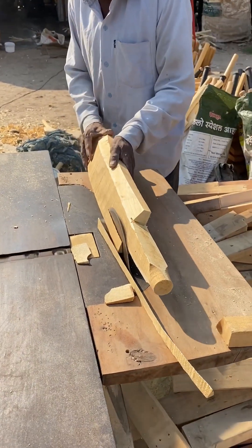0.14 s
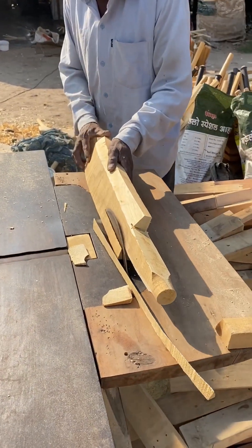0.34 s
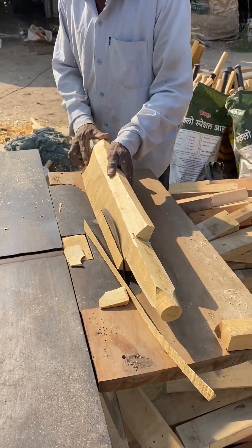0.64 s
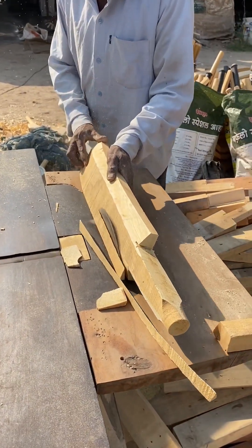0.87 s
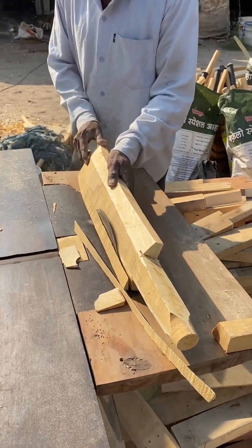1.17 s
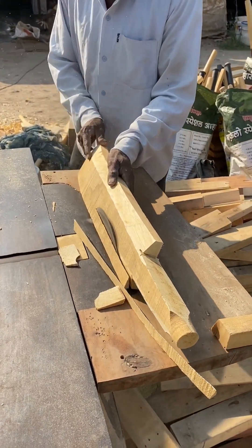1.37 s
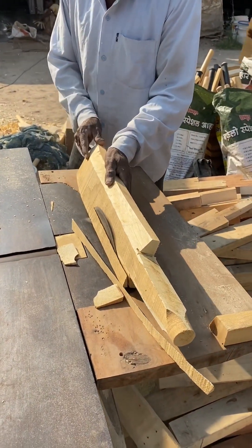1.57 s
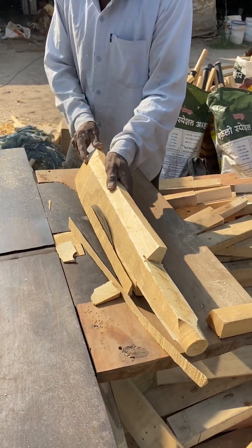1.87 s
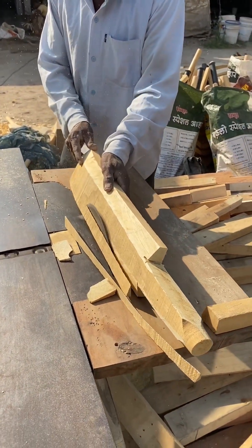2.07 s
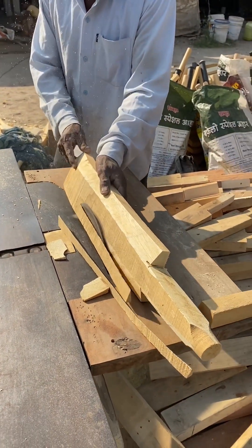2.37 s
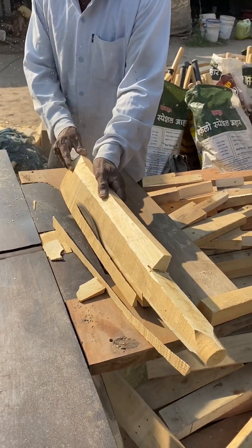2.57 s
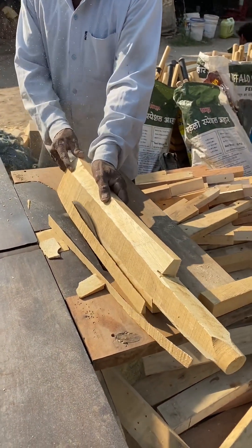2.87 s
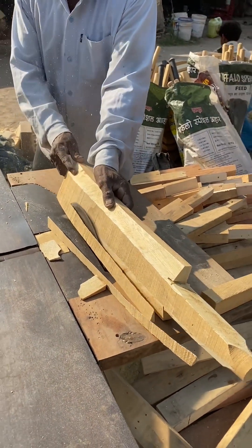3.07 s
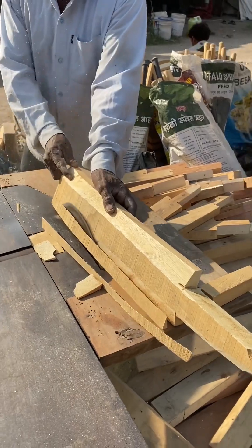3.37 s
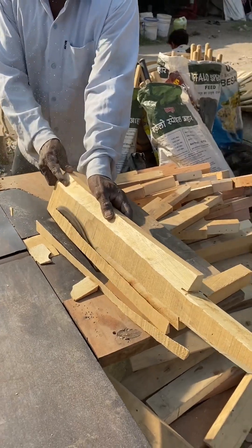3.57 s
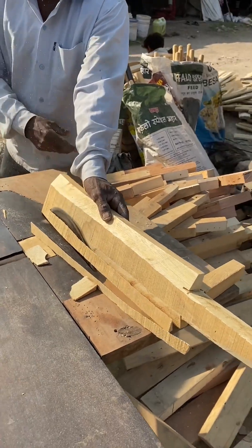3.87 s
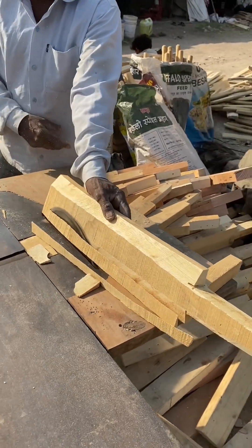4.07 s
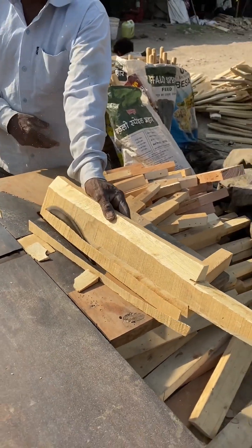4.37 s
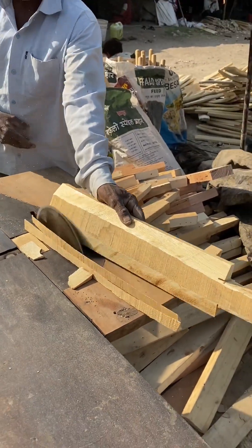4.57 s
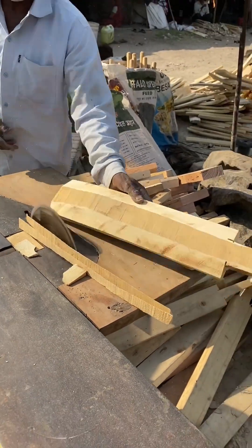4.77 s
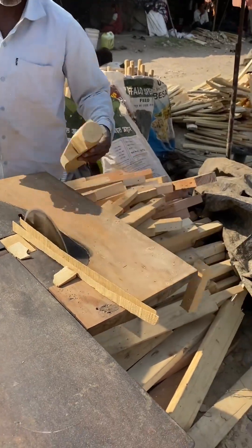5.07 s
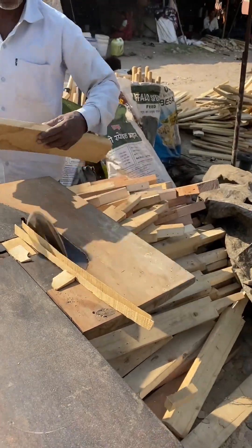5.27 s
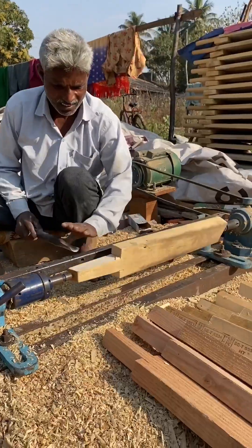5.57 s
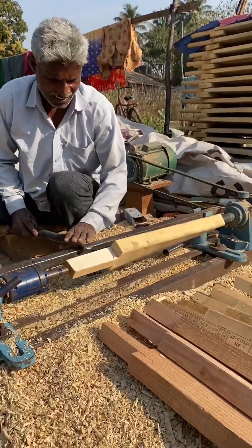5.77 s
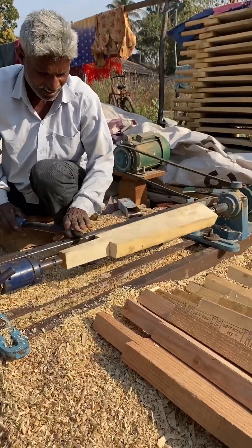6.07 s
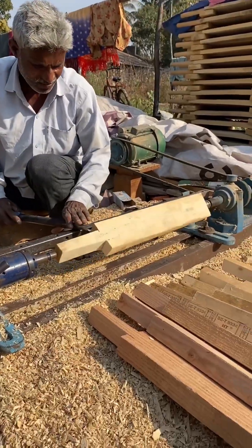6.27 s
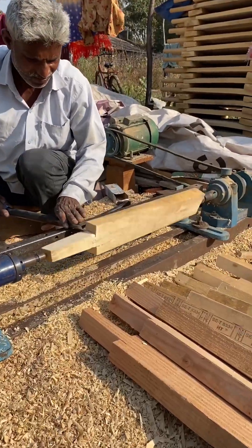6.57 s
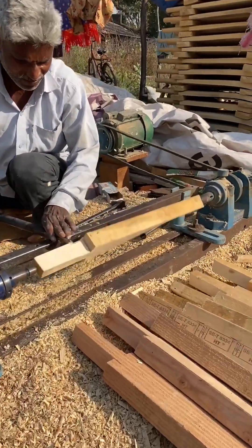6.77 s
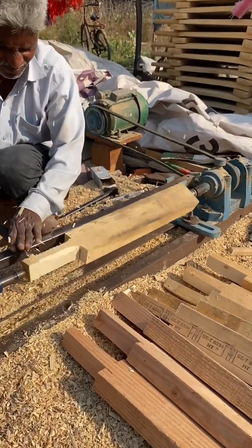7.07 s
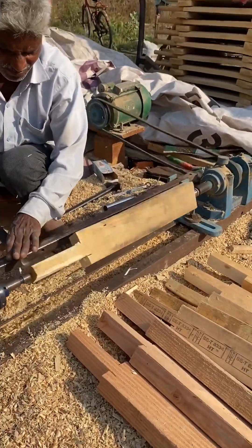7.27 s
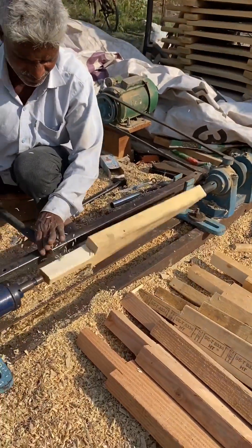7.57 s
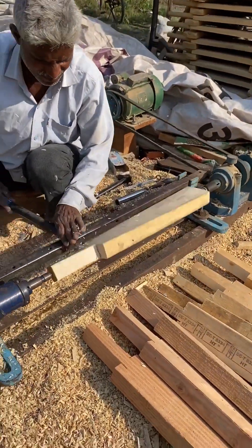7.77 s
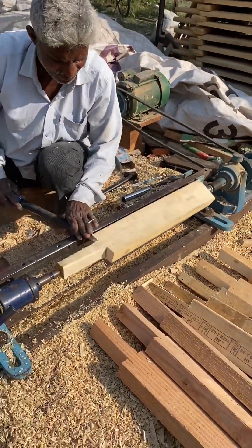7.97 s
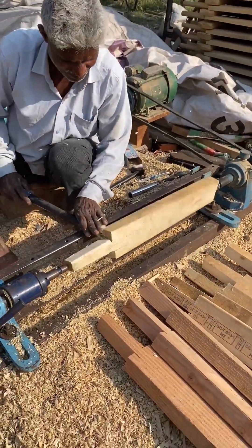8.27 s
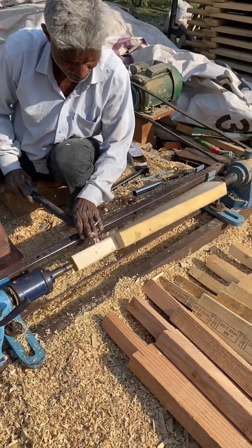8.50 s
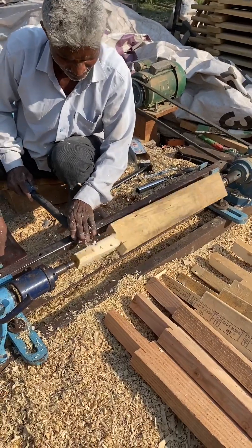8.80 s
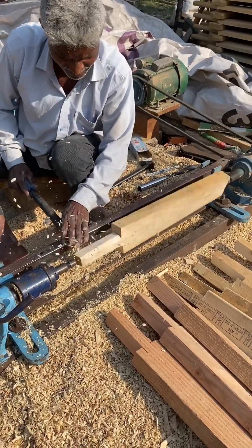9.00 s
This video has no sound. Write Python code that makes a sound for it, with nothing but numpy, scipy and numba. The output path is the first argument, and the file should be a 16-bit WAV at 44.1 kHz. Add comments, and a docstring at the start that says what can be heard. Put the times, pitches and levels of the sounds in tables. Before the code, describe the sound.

Captured close, in open air and wide stereo: first a loud, bright circular saw rasp with sung blade tones, its pitch sagging under load and rising again as the wood clears. After a moment of quieter free running, the sound jumps to a wood lathe's steady drone. Wind thumps the microphone, then a hand gouge bites in quick, uneven crackling bursts, easing midway and returning as a regular scraping flutter.

```python
"""Table saw ripping a blank outdoors: uneven tooth pattern per turn, fresh tearing noise, sung blade tones.
It then runs free on drive tones and windage; at 5.308 s the scene switches to a lathe in the same yard.
Lathe: hum, frame tones, bearing and belt noise; chip bursts and rubbing from a gouge; ringing modes for
a tool clink and wooden knocks. Wind gusts are lumpy low noise; filters spread it all over left and right."""
import sys
import numpy as np
from scipy import signal
from scipy.fft import rfft, irfft, next_fast_len
from scipy.io import wavfile
from scipy.ndimage import uniform_filter1d, map_coordinates
from numba import njit

SR = 44100
rng = np.random.default_rng(int(sys.argv[2]) if len(sys.argv) > 2 else 0)


def dump(signal):
    """Clip the signal to [-1, 1] and save it as 16-bit WAV at the path in sys.argv[1]."""
    limited = np.clip(np.atleast_2d(signal).T, -1, 1)
    pcm = np.round(limited * 32767).astype(np.int16)
    wavfile.write(sys.argv[1], SR, pcm)


N = 403074
FFT_SIZE = next_fast_len(N + 2000)
SWITCH_S = 5.308  # saw to lathe

# Wind at the microphone: [f/Hz, density/dB]
WIND_SPECTRUM = [(25, -32), (40, -9), (80, 3), (150, -9.5), (280, -14), (400, -29), (600, -34)]
# Wind buffets: [t/s, hold/s, level/dB]
GUSTS = [(6.244, .005, -19), (6.272, 0.018, -17.5), (6.322, .005, -22), (6.341, 0.0068, -13.5),
         (6.375, .008, -14.5), (6.435, 0.0099, -14), (6.449, 0.0056, -11.5), (6.513, 0.025, -30),
         (6.64, 0.027, -27.5), (6.695, 0.12, -29.5)]
# Breeze, opposite in left and right: [t/s, level/dB]
BREEZE_LEVEL = [(6.15, -45), (6.3, -41), (6.45, -31), (6.6, -30), (6.9, -44), (7.2, -45), (7.6, -41),
                (8, -40), (8.4, -41), (8.8, -52), (9.14, -57)]
# Its spectrum: [f/Hz, density/dB]
BREEZE_SPECTRUM = [(40, -14), (90, 0), (160, -4), (280, -6), (400, -25)]
WIND_LUMPS_DB, GUST_RISE_DB_PER_S, GUST_FALL_DB_PER_S = 2.0, 450, 400

# Lathe running: [t/s, machine noise level/dB, wind level/dB]
LATHE_LEVELS = [(5.3, -29, -32.5), (5.9, -29, -38), (6.45, -29, -24), (6.75, -24.5, -44), (7.15, -31, -38),
                (7.6, -32.5, -48), (7.95, -35, -49), (8.3, -25, -40), (8.8, -27, -42), (9.14, -35.5, -43)]
# Bearings and belt: [f/Hz, density/dB]
LATHE_SPECTRUM = [(30, -35), (55, -19), (150, -3.5), (250, 2.5), (420, -5), (600, 2), (1000, -0.5),
                  (1600, -4), (2500, -7), (3600, -9), (4800, -9.5), (5800, -10.5), (7000, -24.5),
                  (9000, -42), (12000, -25), (13000, -51)]
# Motor hum: [t/s, peak level/dB]
HUM_LEVEL = [(5.3, -34.5), (5.45, -26.5), (5.7, -28), (6.05, -29.5), (6.15, -40), (6.6, -34), (7, -43),
             (7.6, -46), (8, -41), (8.5, -31.5), (9.14, -36.5)]
# Frame tones: [f/Hz, level/dB against the machine noise]
FRAME_TONES = [(205, -35), (236, -15), (265, -23), (294, -19.5), (352, -21), (496, -12.5), (817, -21.5)]
HUM_HZ = 99.9

# Steel tool chattering on the rest: [t/s, level/dB]
CLINKS = [(5.7501, -26), (5.7508, -14), (5.7518, -20), (5.768, -37)]
# Its modes: [f/Hz, level/dB, t60/s]
STEEL_MODES = [(1950, -15, 0.063), (2360, -14, .04), (2870, -8.5, 0.038), (3300, -10, 0.028),
               (4500, -18, 0.035), (4700, 7.5, 0.037), (5520, -7, 0.057), (5700, -25, .05),
               (6900, -9, 0.038), (7900, -6, 0.056), (10500, -12, 0.076), (12100, -30, .04),
               (15000, -32, .04)]
# Wooden knocks: [t/s, level/dB, hardness 0-1]
WOOD_KNOCKS = [(5.564, -18.5, 0.3), (6.432, -8, 0.23), (7.12, -36, 0.2), (7.476, -45, 0.8),
               (8.101, -21, 0.96)]
# Modes of the blank: [f/Hz, level/dB, t60/s]
BLANK_MODES = [(266, 9.5, 0.016), (660, 6, 0.03), (1260, -32, 0.034), (3280, 6.5, 0.01), (4500, 0, .012)]

# Gouge on the blank: [t/s, rubbing hiss level/dB, rubbing ring level/dB, bite ring gain/dB]
GOUGE_LEVELS = [(6.45,-39.5,-45,1), (6.58,-33.5,-58,-16), (6.74,-30,-26,-6), (6.89,-32,-26.5,-9),
                (7.02,-30,-22.5,-5), (7.15,-28.5,-24.5,-6), (7.25,-49,-43.5,-12), (7.36,-31,-26.5,-11),
                (7.54,-30,-25.5,-13), (7.72,-33.5,-30.5,-0.5), (7.86,-42.5,-40,-6), (8.03,-38.5,-38,-8),
                (8.16,-33.5,-33,1), (8.3,-24.5,-39,-22), (8.42,-24,-22,-3.5), (8.54,-27.5,-29,-12),
                (8.83,-30,-25,-6), (9.0,-33.5,-25.5,-3), (9.14,-30.5,-31,0)]
# Corners tearing past the edge, some chattering: [t/s, level/dB ahead of the bite gains, length/ms]
BITES = [(6.53, -17.5, 9.4), (6.558, -15, 3.3), (6.565, -18.5, 12), (6.597, -18, 11), (6.631, -16.5, 11),
         (6.642, -16, 4.2), (6.6653, -19, 18), (6.701, -15, 17), (6.732, -16, 9), (6.761, -19, 2.7),
         (6.767, -13, 4.2), (6.801, -12, 5.4), (6.811, -15, 5.8), (6.828, -11, 3.3), (6.835, -14, 8.6),
         (6.8456, -16, 7.3), (6.8625, -8, 4), (6.867, -14, 10), (6.8783, -24, 3.7), (6.897, -14, 5.2),
         (6.902, -7, 3), (6.9138, -23, 3.6), (6.9304, -8, 3.3), (6.9366, -15, 7.2), (6.9484, -15, 5.9),
         (6.971, -12, 8.2), (6.9818, -12, 2.6), (6.9987, -8, 3.0), (7.0043, -12, 3.7), (7.039, -16, 8.2),
         (7.07, -17, 11), (7.0864, -18, 8.6), (7.1034, -13.5, 15), (7.1249, -20, 5.2), (7.1355, -14, 5.7),
         (7.1532, -22, 12), (7.171, -15, 12), (7.1928, -21, 3.2), (7.205, -20, 8.2), (7.2948, -23, 3.7),
         (7.305, -15, 8.3), (7.322, -14, 5.4), (7.328, -18, 4.3), (7.34, -10, 8.4), (7.36, -13.5, 11),
         (7.375, -10.5, 10), (7.39, -16, 7.5), (7.408, -10, 9.5), (7.442, -14, 6.8), (7.4754, -8, 7.1),
         (7.51, -15, 2.6), (7.5474, -29, 7.8), (7.5824, -22, 5.5), (7.616, -22, 4.1), (7.646, -24.5, 36),
         (7.679, -18.5, 7.5), (7.7125, -34, 4.8), (7.728, -32, 3.9), (7.7468, -39, 7.7), (7.7856, -30, 4.0),
         (7.8065, -35, 5.3), (7.865, -29, 3.9), (7.9166, -26, 5.6), (7.9243, -34, 2.9), (7.9339, -28, 6.7),
         (7.95, -24, 6.2), (7.9595, -29, 4.1), (8.018, -24, 3.5), (8.0358, -32, 5.4), (8.1022, -20.5, 13),
         (8.1357, -23, 3.4), (8.1717, -36, 4.6), (8.1883, -31, 4.5), (8.211, -23, 3.1), (8.2279, -22, 6.6),
         (8.238, -19, 6.4), (8.2627, -14.5, 5.4), (8.297, -20, 6.9), (8.3148, -23, 3.1), (8.328, -21, 9),
         (8.3486, -18, 4.2), (8.362, -17, 9), (8.3844, -19, 6.5), (8.399, -19, 5.9), (8.4144, -22, 5.6),
         (8.4347, -23, 8.2), (8.4525, -29, 5.3), (8.4681, -21, 8.3), (8.5, -20, 8.1), (8.5346, -19, 11),
         (8.5687, -15, 6.7), (8.6, -16, 15), (8.6348, -18, 17), (8.6702, -16.5, 16), (8.7027, -16, 11),
         (8.7389, -21, 9.7), (8.771, -12.5, 8.5), (8.8054, -16, 8.5), (8.8415, -15, 13),
         (8.8716, -18.5, 7.7), (8.8946, -32, 3.2), (8.9081, -17.5, 14), (8.9402, -15, 4.8),
         (8.945, -11.5, 5.3), (8.9634, -22, 3.1), (8.9764, -17.5, 11.5), (8.9971, -31, 4.4),
         (9.012, -19.5, 8.3), (9.0265, -35, 3.9), (9.044, -13.5, 6.1), (9.078, -17, 8.4), (9.1133, -17, 13)]
# Chips: [f/Hz, density/dB]
CHIP_SPECTRUM = [(150, -22), (250, 2.5), (450, -8), (750, -5.5), (1100, -10), (1650, 3), (2300, -4),
                 (2900, -6), (3500, -3.5), (4400, -4.5), (5200, -7), (6500, -7.5), (8500, -9.5),
                 (10000, -10.5), (12500, -15), (14000, -29.5), (15800, -18)]
# Overhanging gouge ringing, pitch shifting with the grip: [t/s, f/Hz, gain/dB]
TOOL_RING = [(6.5, 3820, -2), (7.07, 3400, -1), (7.5, 3700, -3), (7.62, 3300, 4), (8.1, 3400, 1),
             (8.25, 3700, 8), (8.5, 3300, 14), (8.8, 3320, 4), (8.9, 4400, -2), (9.0, 4130, 18.5),
             (9.14, 4200, 9)]
RING_BELOW_HZ, BITE_HISS_DB, TOOL_RING_WIDTH_HZ = 3540, -3.5, 490
BITE_RISE_SHARE, BITE_FALL_SHARE = 0.21, 0.26  # Gaussian sigmas over bite length

# Blade speed, sagging under load: [t/s, tooth passing f/Hz]
TOOTH_PASSING = [(0, 3940), (0.3, 3928), (0.6, 3910), (0.75, 3880), (1.05, 3878), (1.35, 3997), (1.5, 4028),
                 (1.62, 4020), (1.85, 3888), (2.1, 3935), (2.35, 3865), (2.55, 3805), (3.05, 3789),
                 (3.35, 3800), (3.65, 3865), (3.85, 3958), (4.0, 3998), (4.2, 3984), (4.47, 3998),
                 (4.75, 4120), (5.31, 4115)]
# Wood in the blade: [t/s, wood body level/dB, tooth hiss level/dB]
FEED_LEVELS = [(0, -42, -28), (0.12, -30, -24), (0.45, -31.5, -23.5), (0.6, -27, -22.5), (0.85, -28.5, -19),
               (1.1, -30.5, -20.5), (1.64, -36, -29.5), (1.7, -29.5, -22.5), (2.0, -29.5, -23),
               (2.3, -25, -19), (2.45, -24.5, -21), (2.8, -27.5, -24.5), (3.35, -31.5, -25),
               (3.68, -27.5, -29), (3.87, -34, -36), (4.02, -30.5, -26.5), (4.2, -34, -27),
               (4.42, -31, -21.5), (4.6, -33.5, -48), (4.75, -76, -94)]
# Sound of the cut: [f/Hz, density/dB]
CUT_SPECTRUM = [(300, -7), (500, -16), (750, -2), (1000, -9), (1450, -12), (2000, -10), (2600, -1.5),
                (3200, -3), (4500, -2), (6300, -2.5), (7400, -4), (8400, -2), (9700, 0), (10400, -4),
                (12300, -7), (13000, -13), (13600, -21), (15500, -22)]
# Slot resonance, mostly sinking as the slot deepens: [t/s, f/Hz, gain/dB]
KERF_RESONANCE = [(2.1, 6840, -1), (2.7, 6120, 13), (3.2, 6000, 12.5), (3.6, 5730, 12), (3.8, 5970, 14.5)]
# Blade and blank resonances: [f/Hz, width/Hz, gain/dB]
PLATE_RESONANCES = [(753, 83, 15), (1402, 250, 12.5), (1550, 80, 5), (1990, 48, 7.5), (2570, 26, 5),
                    (3510, 260, 12), (4217, 240, 11), (4990, 88, 9.5), (5950, 52, 3), (6676, 130, 9.5)]
# Upper middle of the cut, hollow around 3.75 s, full again by 4.45 s, then gone: [t/s, gain/dB]
UPPER_MIDDLE_GAIN = [(0, 3), (1.7, 4), (2.5, 1.5), (3.0, 3), (3.5, -0.5), (3.75, -18), (3.95, -7),
                     (4.15, -1), (4.3, 0), (4.45, 2), (4.6, -21)]
# Treble of the cut: [t/s, gain/dB]
TREBLE_GAIN = [(0, 8), (0.5, 6.5), (1.0, 3), (1.3, 2.5), (1.6, 4), (2.0, 3.5), (2.5, 1.5), (3.0, 3.5),
               (3.5, 4.5), (3.9, 8), (4.2, 2.5), (4.5, -1)]
# Blade singing out: [t/s, length/s, cycles per turn, peak level/dB]
BLADE_SINGS = [(0.18, 0.4, 53, -33.5), (1.956, 0.4, 24, -44), (2.1, 0.083, 40, -29.5), (2.1, 0.64, 26, -50),
               (2.7, 0.71, 65, -35), (2.6, 0.074, 60, -31.5), (3.5, 0.46, 120, -45),
               (3.015, 0.854, 24, -39.5), (3.78, 0.643, 60, -42.5), (3.99, 0.07, 60, -25),
               (4.23, 0.1, 60, -34), (3.5, 0.24, 110, -24), (0.72, 0.044, 60, -49), (0.95, 0.041, 66, -34),
               (4.3, 0.041, 92, -27)]
# Drive tones: [multiple of two per turn, level/dB against the tones]
DRIVE_ORDERS = [(1, -9), (2, -4.5), (3, -9), (4, -7), (5, -2), (6, -1), (7, -25), (8, -28), (9, -6.5),
                (10, -32), (11, -28), (12, -6.5), (14, -11), (16, -21.5), (18, -16), (20, -26), (26, -21),
                (30, -13)]
# Saw drive: [t/s, tones level/dB, windage level/dB, wind level/dB]
SAW_DRIVE_LEVELS = [(0, -40.5, -35, -61), (1, -45.5, -37.5, -66), (2.3, -45.5, -40.5, -67),
                    (3, -51, -38.5, -65), (3.55, -51.5, -46.5, -59), (3.9, -49, -43.5, -70),
                    (4.02, -51, -46, -62), (4.06, -49, -42, -51), (4.14, -51, -45.5, -67),
                    (4.3, -49, -40.5, -69), (4.6, -51, -45.5, -73), (4.9, -52, -53.5, -73),
                    (5.3, -48, -49.5, -68)]
# Air stirred by the blade: [f/Hz, density/dB]
WINDAGE_SPECTRUM = [(40, -41), (100, -13.5), (350, 0.5), (750, 5), (1050, 6), (1300, 8.5), (1650, -2.5),
                    (2250, 5.5), (3500, 4), (5000, 0.5), (6500, -5), (9000, -16), (11000, -17),
                    (13000, -42)]
TEETH, SPEED_WOBBLE = 60, .0007
PATTERN_SHIFTS_PER_S, LASTING_SHARE = 11, .6
FEED_FLUTTER_DB, WHINE_FLUTTER_DB, SING_FADE_S = 1.4, 4, .08
RASP_WIDTH_HZ, RASP_DB = 250, 7  # rough band round the octave of the tooth note
UPPER_MIDDLE_FROM_HZ, HISS_FROM_HZ, TREBLE_FROM_HZ = 2750, 3940, 8350
WHINE_BELOW_HISS_DB, OCTAVE_BELOW_HISS_DB = 22, 13  # tooth note and its octave

# Stereo width of the saw part: [f/Hz, left lead/rad, likeness 0-1, left over right/dB]
SAW_WIDTH = [(0, 0, 1, 0), (70, 0, 1, 0), (160, 0, .96, 0), (250, .3, .85, 0), (375, .8, .8, 0),
             (525, 1.7, .8, 1), (700, 2.1, .85, 5), (900, 3.1, .95, 0), (1120, 3.6, .7, 4),
             (1370, 4.6, .73, 5), (1650, 5.4, .48, 8), (2300, 7.5, .25, 6), (2700, 8.7, .5, 4),
             (3200, 9.5, .15, 4), (3700, 9.3, .2, 3), (3950, 7, .6, 2), (4350, 7, .35, 1),
             (4850, 8.9, .6, 1), (5900, 8.1, .64, 0), (7100, 8.9, .76, 0), (7800, 9.1, .88, 0),
             (8300, 9.42, .995, 0), (10000, 9.42, .995, 0), (10200, 9.4, .1, 0), (11750, 8.8, .47, 0),
             (13600, 8.9, .5, 0), (14500, 9.42, .9, 0)]
# Stereo width of the lathe part: [f/Hz, left lead/rad, likeness 0-1, left over right/dB]
LATHE_WIDTH = [(0, 0, 1, 0), (250, .1, .95, 0), (375, .5, .82, 0), (525, 1.1, .82, 1), (700, 1.7, .82, 3),
               (900, 2.6, .72, 5), (1120, 4, .55, 7), (1370, 5.5, .66, 6), (1650, 6.2, .72, 5),
               (1950, 6.6, .7, 3), (2300, 7.9, .44, 2), (3500, 6.5, .2, 3), (4350, 8.8, .55, 1),
               (4850, 9.3, .82, 0), (5900, 8.3, .45, -1), (7100, 8.9, .8, 0), (7800, 9.4, .93, 0),
               (9900, 9.42, .95, 0), (10300, 8, .2, 0), (11750, 9.2, .65, 0), (12900, 8, .3, 0),
               (14500, 9.42, .8, 0)]
DIFFUSE_T60_S, DIFFUSE_SHIFTS_PER_S, CUTOFF_HZ = .035, 6, 16300


def amp(db):
    """Gain of a level in dB."""
    return 10 ** (np.asarray(db) / 20)


def unit(x):
    """Scale to rms 1."""
    return x / np.sqrt(np.mean(x ** 2) + 1e-20)


def evened(x, size):
    """Hold the level steady over a short span of samples."""
    return x / np.sqrt(uniform_filter1d(x ** 2, size=size) + 1e-9)


def in_time(rows):
    """Interpolate the columns of a curve table at every sample."""
    s, *columns = np.transpose(rows)
    return [np.interp(np.arange(N) / SR, s, c) for c in columns]


def during(rows, fade=.004):
    """1 within the time span of a table, fading to 0 just outside."""
    t = np.arange(N) / SR
    return np.clip(np.minimum(t - rows[0][0], rows[-1][0] - t) / fade + 1, 0, 1)


def colour(x, spectrum, modes=()):
    """Shape x by a density spectrum and resonance humps; rms 1."""
    hz = np.fft.rfftfreq(FFT_SIZE, 1 / SR) + 1
    f_hz, density_db = np.transpose(spectrum)
    shape_db = np.interp(np.log(hz), np.log(f_hz), density_db)
    # 24 dB/octave beyond both ends
    shape_db -= 24 * np.log2(np.maximum(f_hz[0] / hz, 1) * np.maximum(hz / f_hz[-1], 1))
    for centre_hz, width_hz, top_db in modes:
        shape_db += top_db / (1 + (2 * (hz - centre_hz) / width_hz) ** 2)
    return unit(irfft(rfft(x, FFT_SIZE) * amp(shape_db), FFT_SIZE)[:N])


def low_high(x, hz):
    """Fourth-order low and high parts."""
    return [signal.sosfilt(signal.butter(4, hz, kind, fs=SR, output="sos"), x) for kind in ("low", "high")]


def split(x, hz):
    """Low and high parts, each rms 1."""
    return [unit(part) for part in low_high(x, hz)]


def drift(rate):
    """Slow smooth chance, spread about 1, two draws per cycle of rate in Hz."""
    steps = np.arange(0, N + 32, 32)
    slow = map_coordinates(rng.standard_normal(600), [steps / SR * rate * 2 % 599], order=3)
    return np.interp(np.arange(N), steps, slow)


@njit
def moving_peak(x, hz, r, rate):
    """Two-pole resonance with a gliding centre; gain about 1 on top."""
    y = np.zeros(len(x))
    for i in range(2, len(x)):
        drive = (1 - r * r) / 2 * (x[i] - x[i - 2])
        y[i] = drive + 2 * r * np.cos(2 * np.pi * hz[i] / rate) * y[i - 1] - r * r * y[i - 2]
    return y


def resonate(x, hz, width_hz):
    """Moving peak with its bandwidth set in Hz."""
    return moving_peak(x, hz, np.exp(-np.pi * width_hz / SR), SR)


def struck(events, modes):
    """Each blow rings every decaying mode; hard blows favour the high ones."""
    out = np.zeros(N)
    for hz, level_db, t60_s in modes:
        clicks = np.full(N, 1e-18)
        for s, blow_db, *hardness in events:
            tilt_db = 0
            if hardness:
                tilt_db = -(1 - hardness[0]) * 14 * max(np.log2(hz / 700), 0)
                tilt_db -= hardness[0] * 8 * max(np.log2(1200 / hz), 0)
            clicks[round(s * SR)] = amp(blow_db + level_db + tilt_db)
        r, w = amp(-60 / (t60_s * SR)), 2 * np.pi * hz / SR
        out += signal.lfilter([0, np.sin(w)], [1, -2 * r * np.cos(w), r * r], clicks)
    return out


def breeze():
    """Lumpy low noise, meant for left and right with opposite signs."""
    level = amp(in_time(BREEZE_LEVEL)[0] + WIND_LUMPS_DB * drift(16)) * during(BREEZE_LEVEL)
    return level * colour(rng.standard_normal(N), BREEZE_SPECTRUM)


def wind():
    """Lumpy low noise at the microphone; gusts rise, hold and fall away."""
    t = np.arange(N) / SR
    level_db = np.where(t < SWITCH_S, in_time(SAW_DRIVE_LEVELS)[2], in_time(LATHE_LEVELS)[1])
    for s, hold_s, gust_db in GUSTS:
        rise_db = GUST_RISE_DB_PER_S * np.maximum(s - t, 0)
        fall_db = GUST_FALL_DB_PER_S * np.maximum(t - s - hold_s, 0)
        level_db = np.maximum(level_db, gust_db - rise_db - fall_db)
    noise = evened(colour(rng.standard_normal(N), WIND_SPECTRUM), size=2500)
    return amp(level_db + WIND_LUMPS_DB * drift(15)) * noise


def lathe():
    """Bearing and belt noise, mains hum and wavering frame tones."""
    t = np.arange(N) / SR
    noise_db = in_time(LATHE_LEVELS)[0]
    hum = amp(in_time(HUM_LEVEL)[0] + drift(8.9)) * np.sin(2 * np.pi * HUM_HZ * t + 0.12 * drift(1.8))
    frame = sum(amp(db + 5.4 * drift(5)) * np.sin(2 * np.pi * hz * t + 1.54 * drift(5))
                for hz, db in FRAME_TONES)
    rumble = colour(rng.standard_normal(N) * amp(1.38 * drift(15)), LATHE_SPECTRUM)
    return hum + amp(noise_db) * (frame + rumble)


def tool_clink():
    """Steel modes rung by a chatter of blows on the rest."""
    return struck(CLINKS, STEEL_MODES)


def wooden_knocks():
    """Short wood modes rung by blows of varied hardness."""
    return struck(WOOD_KNOCKS, BLANK_MODES)


def bite_envelope():
    """Lopsided Gaussian swell for each corner torn past the edge."""
    t = np.arange(N) / SR
    bite = np.zeros(N)
    for s, level_db, length_ms in BITES:
        near = slice(round(s * SR) - 800, round(s * SR) + 1200)
        off = (t[near] - s) * 1000 / length_ms
        share = np.where(off < 0, BITE_RISE_SHARE, BITE_FALL_SHARE)
        bite[near] += amp(level_db) * np.exp(-.5 * (off / share) ** 2)
    return bite


def gouge():
    """Each bite tears off chips and rings wood and tool; the edge rubs in between."""
    rub_hiss_db, rub_ring_db, ring_db = in_time(GOUGE_LEVELS)
    bite = bite_envelope()
    flutter = amp(2.0 * drift(30))
    ringing = (amp(ring_db) * bite + amp(rub_ring_db) * flutter) * during(GOUGE_LEVELS, fade=0.052)
    hissing = (amp(BITE_HISS_DB) * bite + amp(rub_hiss_db) * flutter) * during(GOUGE_LEVELS, fade=0.017)
    chips = rng.standard_normal((2, N)) * amp(2.0 * np.minimum(rng.exponential(1, N), 4))
    wood_modes = [(1530, 430, 3.2), (1970, 32, 10.7), (2875, 120, 11.0)]  # f/Hz, width/Hz, gain/dB
    low = split(colour(chips[0], CHIP_SPECTRUM, wood_modes), RING_BELOW_HZ)[0]
    high = split(colour(chips[1], CHIP_SPECTRUM, [(6700, 300, 3.0)]), RING_BELOW_HZ)[1]
    tool_hz, tool_db = in_time(TOOL_RING)
    torn = evened(rng.standard_normal(N), size=200) * bite * during(GOUGE_LEVELS)
    tool = amp(tool_db) * resonate(torn, tool_hz, TOOL_RING_WIDTH_HZ)
    return evened(low, size=400) * ringing + evened(high, size=200) * hissing + tool


def saw_drive(turns):
    """Drive tones locked to the blade turns, plus windage noise."""
    tones_db, windage_db, _ = in_time(SAW_DRIVE_LEVELS)
    tones = sum(amp(db + drift(4.9)) * np.sin(4 * np.pi * k * turns + 7 * rng.random())
                for k, db in DRIVE_ORDERS)
    windage = colour(rng.standard_normal(N), WINDAGE_SPECTRUM, [(1580, 110, 12.0)])
    return amp(tones_db) * tones + amp(windage_db) * windage


def tooth_pattern(turns):
    """Uneven teeth repeat per turn: one lasting bite pattern, five that come and go."""
    order = np.arange(2049)
    # four slots in the rim stress every fourth order
    tilt_db = 3.5 * (order % 4 == 0) - 7.2 * np.maximum(order - 60, 0) / 60
    slots = amp(tilt_db) * (order < 230) * np.clip(order / 24, 0, 1) ** 2
    pattern = 0
    for k in range(6):
        phases = np.exp(2j * np.pi * rng.random(2049))
        wheel = unit(irfft(slots * amp(rng.normal(0, 2.44, 2049)) * phases))
        share = drift(PATTERN_SHIFTS_PER_S) if k else LASTING_SHARE
        pattern = pattern + share * np.interp(turns % 1, np.linspace(0, 1, 4096), wheel)
    return evened(pattern, size=2700)


def tearing_fibres(turns):
    """Fresh spiky noise throbbing at 1, 2 and 4 per turn."""
    throb = 1 + sum(depth * np.cos(2 * np.pi * k * turns) for k, depth in [(1, .037), (2, .072), (4, .39)])
    level_db = FEED_FLUTTER_DB * drift(23) + 2.0 * np.minimum(rng.exponential(1, N), 4)
    return unit(rng.standard_normal(N) * throb * amp(level_db))


def blade_whine(turns, hiss_db):
    """Sines at whole cycles per turn: tooth note and octave follow the hiss, others sing out."""
    notes = {}
    for k, below_db in [(TEETH, WHINE_BELOW_HISS_DB), (2 * TEETH, OCTAVE_BELOW_HISS_DB)]:
        notes[k] = amp(hiss_db - below_db + WHINE_FLUTTER_DB * drift(5.0))
    for s, length_s, k, db in BLADE_SINGS:
        sung = amp(db) * during([(s,), (s + length_s,)], fade=SING_FADE_S)
        notes[round(k)] = notes.get(round(k), 0) + sung
    return sum(size * np.sin(2 * np.pi * k * turns) for k, size in notes.items())


def saw():
    """Tooth pattern and tearing noise excite slot, blade and blank; whine and drive add tones."""
    tooth_hz, = in_time(TOOTH_PASSING)
    turns = np.cumsum(tooth_hz * (1 + SPEED_WOBBLE * drift(12)) / TEETH) / SR
    bite = 1.4 * tooth_pattern(turns) + tearing_fibres(turns)
    kerf_hz, kerf_db = in_time(KERF_RESONANCE)
    kerf_gain = (amp(kerf_db) - 1) * during(KERF_RESONANCE, fade=0.62)
    bite += kerf_gain * resonate(bite, kerf_hz, 600)
    bite += amp(RASP_DB) * resonate(bite, 2 * tooth_hz, RASP_WIDTH_HZ)
    body, hiss = split(colour(bite, CUT_SPECTRUM, PLATE_RESONANCES), HISS_FROM_HZ)
    lower, upper = low_high(body, UPPER_MIDDLE_FROM_HZ)
    body = lower + amp(in_time(UPPER_MIDDLE_GAIN)[0]) * upper
    presence, treble = low_high(hiss, TREBLE_FROM_HZ)
    hiss = presence + amp(in_time(TREBLE_GAIN)[0]) * treble
    body_db, hiss_db = in_time(FEED_LEVELS)
    cut = amp(body_db) * body + amp(hiss_db) * hiss + blade_whine(turns, hiss_db)
    return cut * during(FEED_LEVELS, fade=0.15) + saw_drive(turns)


def stereo_width(dry, table):
    """Left and right share the direct sound with a phase shift; the diffuse copy enters with opposite signs."""
    hz, *columns = np.transpose(table)
    grid = np.fft.rfftfreq(FFT_SIZE, 1 / SR)
    lead, alike, balance_db = (np.interp(grid, hz, c) for c in columns)
    direct, diffuse = rfft(dry, FFT_SIZE) * np.sqrt([(1 + alike) / 2, (1 - alike) / 2])
    left = (direct + diffuse) * amp(balance_db / 2)
    right = (direct - diffuse) * amp(-balance_db / 2) * np.exp(-1j * lead)
    return irfft([left, right], FFT_SIZE)[:, :N]


def diffuse_copy(direct):
    """Blurred copy through five short noise tails with drifting shares, for stereo width."""
    lag_s = np.arange(round(DIFFUSE_T60_S * SR)) / SR
    tails = rng.standard_normal((5, len(lag_s))) * amp(-60 * lag_s / DIFFUSE_T60_S)
    tails /= np.linalg.norm(tails, axis=1, keepdims=True)
    blurred = signal.fftconvolve(direct[None], tails, axes=1)[:, :N]
    shares = np.array([drift(DIFFUSE_SHIFTS_PER_S) for _ in blurred])
    return np.sum(shares * blurred, axis=0) / np.linalg.norm(shares, axis=0)


def scene():
    """Saw, then lathe, with wind; channel 0 direct, channel 1 its diffuse copy."""
    sawing = np.clip((SWITCH_S - np.arange(N) / SR) / 0.0009, 0, 1)
    turning = lathe() + gouge() + tool_clink() + wooden_knocks()
    direct = sawing * saw() + (1 - sawing) * turning + wind()
    return np.array([direct, diffuse_copy(direct)])


def record(dry):
    """Widen the saw and lathe parts, add the breeze in opposite signs, round off peaks, cut the top."""
    sawing = np.arange(N) / SR < SWITCH_S
    both = stereo_width(dry * sawing, SAW_WIDTH) + stereo_width(dry * ~sawing, LATHE_WIDTH)
    both += breeze() * [[1], [-1]]
    lowpass = signal.cheby2(12, 70, CUTOFF_HZ, fs=SR, output="sos")
    return signal.sosfilt(lowpass, np.tanh(both / 1.1) * 1.1)


dry = scene()
out = record(dry)
dump(out)
```